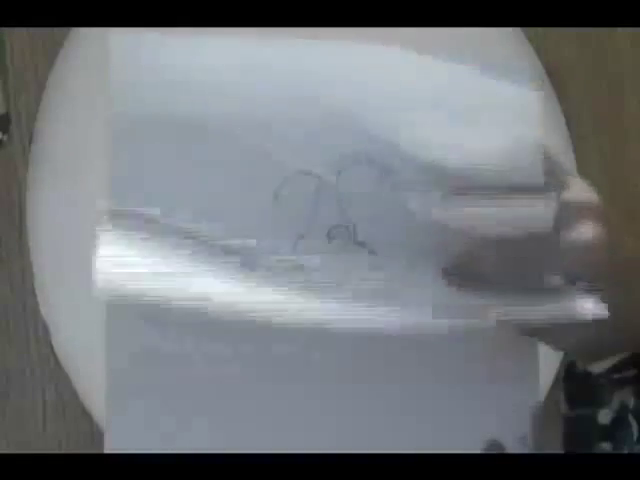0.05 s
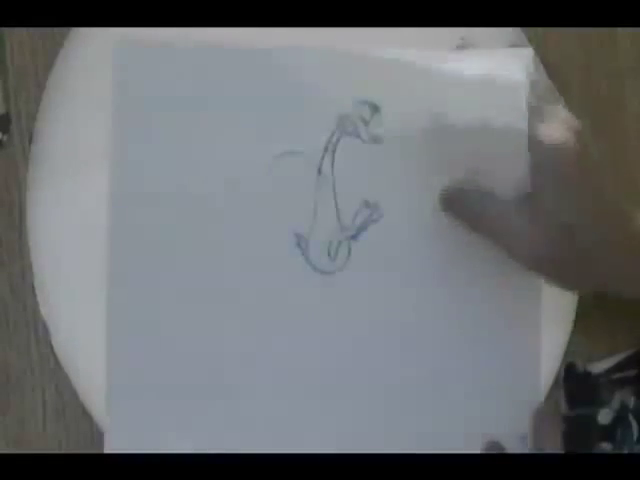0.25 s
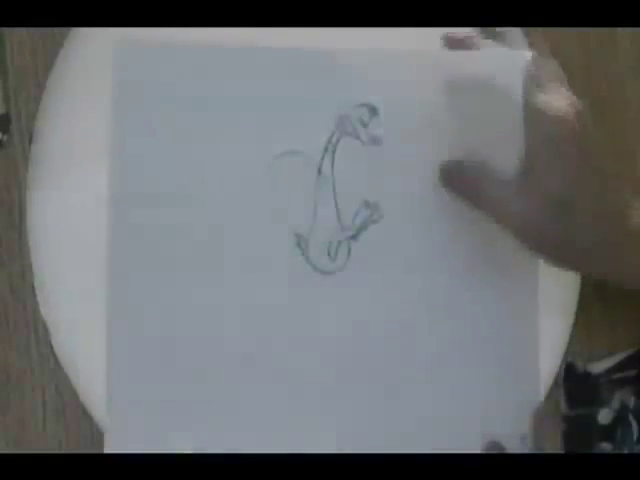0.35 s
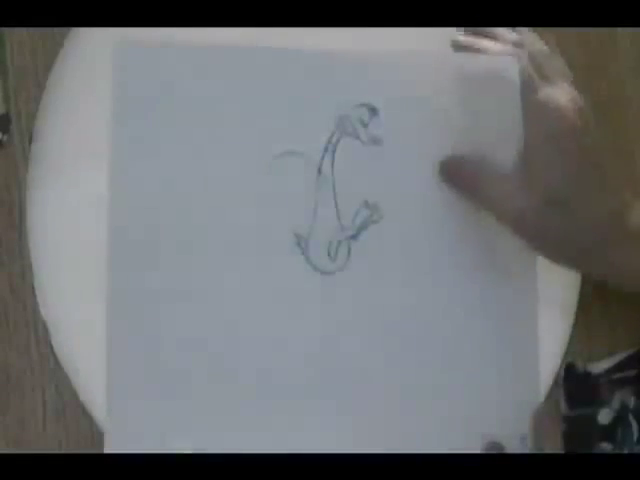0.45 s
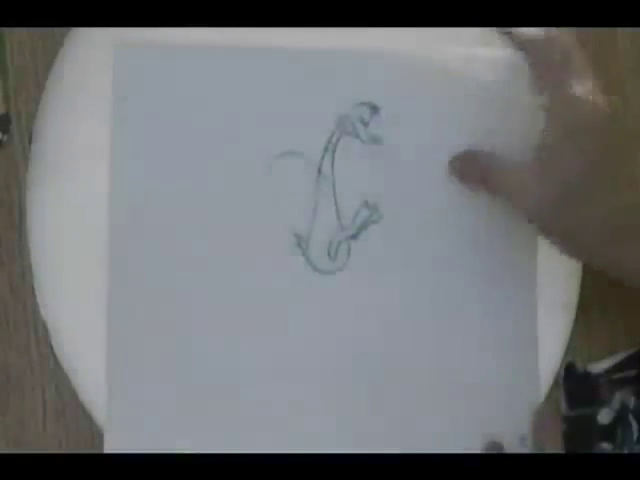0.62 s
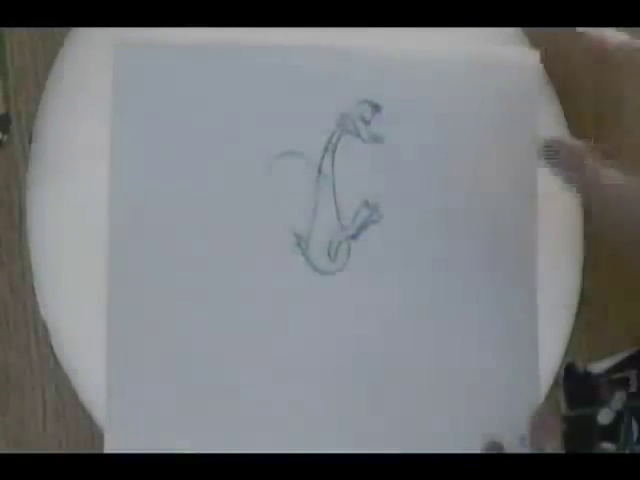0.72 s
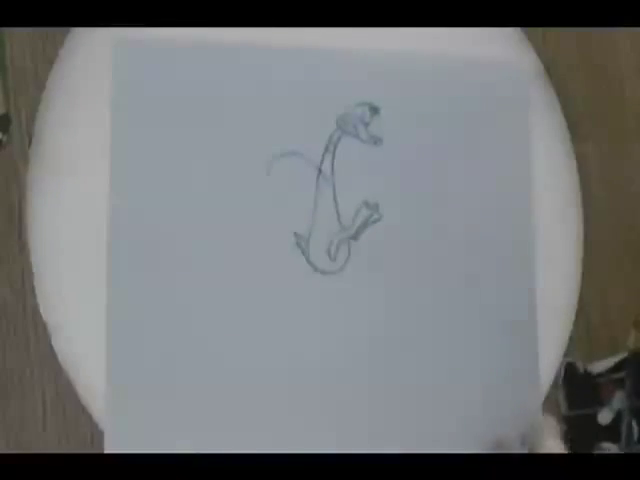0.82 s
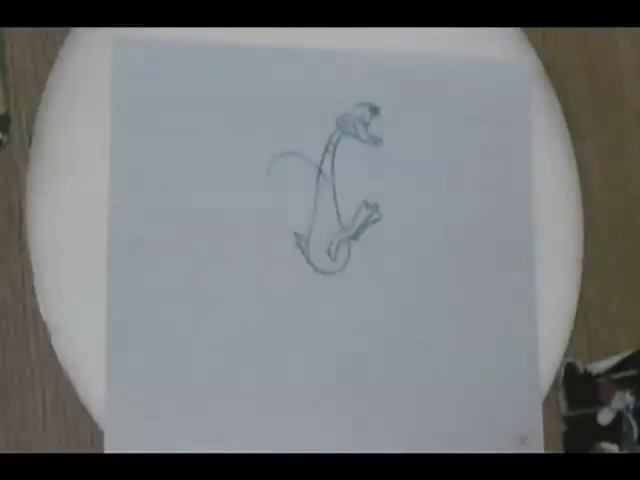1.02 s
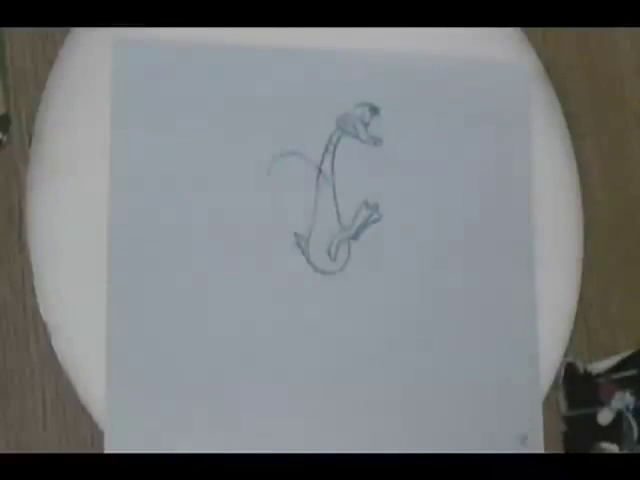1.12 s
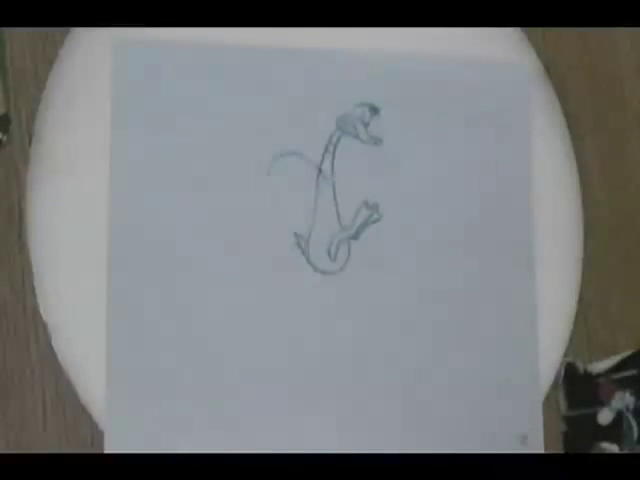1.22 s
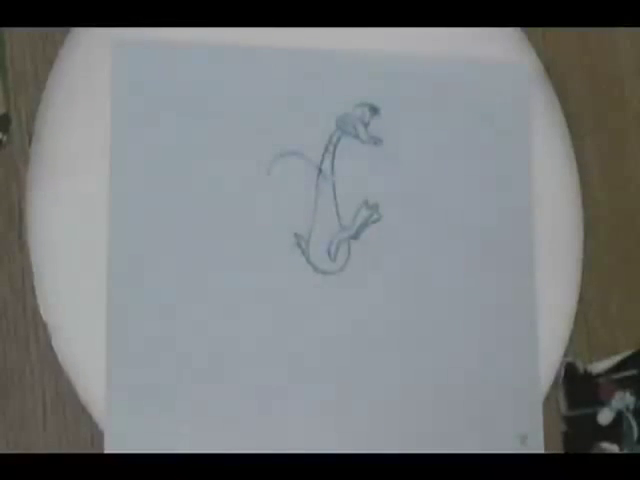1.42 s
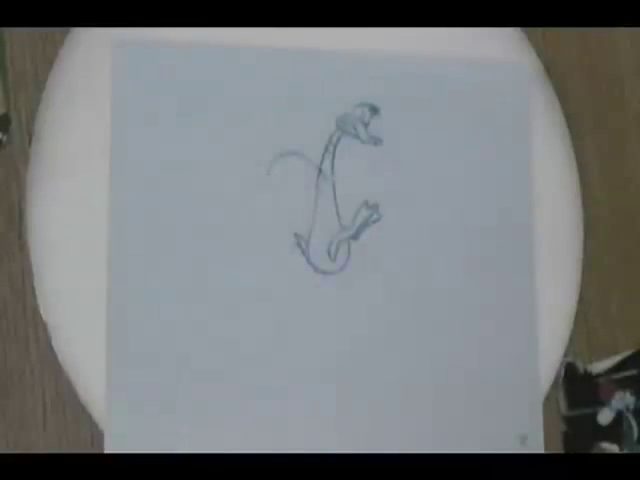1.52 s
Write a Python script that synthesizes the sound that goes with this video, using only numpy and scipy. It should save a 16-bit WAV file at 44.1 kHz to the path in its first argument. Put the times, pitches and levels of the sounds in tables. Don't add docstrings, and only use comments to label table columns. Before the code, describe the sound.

A sheet of paper is let go and smoothed on a desk: light hiss, crackling buckles, one loud bright snap, then small scattered rustles and muffled bumps, heard close with short room ring and low hum.

```python
import sys
import numpy as np
from scipy import signal
from scipy.io import wavfile
from scipy.ndimage import uniform_filter1d

SR = 44100
rng = np.random.default_rng(int(sys.argv[2]) if len(sys.argv) > 2 else 0)


def bounce(signal):
    frames = np.transpose(np.atleast_2d(signal))
    limited = np.clip(frames, -1, 1)
    pcm = np.round(limited * 32767).astype(np.int16)
    wavfile.write(sys.argv[1], SR, pcm)


def amplitude_ratio(level_db):
    exponent = np.asarray(level_db, float) / 20
    return 10 ** exponent


N = 68355
SNAP_S = 0.4915

# (frequency [Hz], gain [dB])
TONE_SHAPE = [(32, -19), (58, -0.5), (140, -7.5), (260, -12), (900, -14.5), (2200, -17.5), (5000, -29.5),
              (15800, -54.5)]
# (frequency [Hz], gain [dB])
TONE_SIDE_SHAPE = [(15, -44), (25, 4), (133, -2.5), (382, 0), (425, -3), (4100, -10), (8270, -18.5),
                   (15800, -44.5)]
# (frequency [Hz], level [dB])
HUM_PARTIALS = [(59, -53), (103, -55)]
# (time [s], level [dB], brightness [dB])
SLIDE_PATH = [(0, -38, -1), (.03, -39.5, -3), (.13, -44.5, 4.5), (.215, -37.5, 0.5), (.235, -38, 6.5),
              (.25, -34, 10), (.28, -39.5, 11.5), (.33, -36, 10), (.36, -47, 13.5), (.43, -38, -1.5),
              (.46, -41, -5), (.5, -42, 6), (.58, -41.5, 6.5), (.63, -37.5, 2), (.68, -41, -3.5),
              (.75, -50.5, 2.5), (1.4, -56, 2), (1.55, -52, 2)]
# (start [s], hold [s], fade t60 [s], level [dB], brightness [dB])
EDGE_SCUFFS = [
    (0.465, 0.041, 0.076, -27.5, -2),
    (0.489, 0.02, 0.24, -29, 2),
    (0.871, 0.034, 0.19, -39.5, -2.5),
    (1.039, 0.02, 0.28, -43, -5),
    (1.106, .01, 0.15, -43, 0),
    (1.119, 0.011, 0.082, -39.5, -15),
    (1.236, 0.012, 0.089, -43.5, -19),
    (1.248, 0.015, 0.3, -36.5, 7.5),
    (1.358, 0.0067, 0.38, -36.5, -7),
    (1.423, 0.026, 0.18, -50.5, -3),
]
# (frequency [Hz], width [Hz], level [dB])
SHEET_MODES = [(1300, 120, 2), (2120, 600, -7), (3190, 50, 3.5), (3720, 97, -27), (5030, 31, -23)]
# (frequency [Hz], gain [dB])
SHEET_SHAPE = [(300, -23.5), (520, -10.5), (900, -13), (1150, -1), (2300, 0), (3900, -5), (4700, -12),
               (15500, -54)]
# (frequency [Hz], gain [dB])
LATE_SCUFF_CUT = [(600, 1), (1150, -7), (1600, 0), (4300, -0.5), (5000, -0.5)]
# (frequency [Hz], gain [dB])
RUB_HISS_SHAPE = [(2500, -13.5), (4500, -1.5), (6000, -0.5), (8000, -0.5), (9000, -6.5), (11000, -8.5),
                  (13500, -15.5), (15500, -24)]
# (start [s], length [s], centre [Hz], level [dB])
DESK_DRAGS = [(1.25, .1, 3100, -46), (.495, .11, 5050, -32.5), (0.0093, .07, 830, -43),
              (.488, .04, 387, -42), (0.969, .1, 300, -47), (.98, .1, 514, -51), (1.4, .15, 750, -48),
              (.494, .1, 3700, -32), (.56, .11, 4800, -41), (.465, .026, 4300, -39), (.925, .13, 140, -46),
              (1.235, .02, 2000, -42), (1.3575, .05, 1500, -38), (.868, .06, 5200, -50),
              (1.1, .05, 5000, -52)]
# (start [s], length [s], centre [Hz], level [dB])
EDGE_SINGS = [(.868, .07, 2680, -45), (.875, 0.046, 1700, -49), (1.055, 0.031, 1650, -43.5),
              (1.045, .02, 2500, -46), (1.12, .045, 1660, -49), (1.262, .045, 1640, -43),
              (1.26, 0.055, 2620, -45), (1.28, .05, 4200, -48.5), (1.25, .04, 3800, -47),
              (.6, .05, 1150, -41.5), (.6, .05, 2150, -39)]
# (time [s], peak [dB], main pitch [Hz], ring t60 [s])
BUCKLES = [(.021, -28, 1544, 0.031), (0.2937, -24, 1300, 0.015), (0.3067, -24, 3150, 0.022),
           (.309, -24, 1900, .015), (0.307, -20.5, 1300, 0.02), (0.328, -34, 2500, .015),
           (0.334, -15, 2203, 0.03), (0.3335, -19, 1140, .024), (0.3386, -15.5, 1956, 0.036),
           (.3397, -10, 2010, 0.015), (0.341, -16, 3610, 0.0098), (.3435, -17, 2110, 0.024),
           (0.347, -19, 1954, 0.031), (0.3353, -17, 3210, .013), (.352, -20, 3220, .012),
           (.3505, -26, 2520, 0.023), (0.4672, -22, 2640, 0.015), (0.474, -14, 1955, 0.006),
           (0.498, -10, 3340, 0.011), (0.5018, -11, 1210, 0.013), (0.5073, -12, 2900, 0.011),
           (.783, -29, 2226, 0.041), (0.7844, -34.5, 3120, 0.029), (0.893, -35, 3060, 0.033),
           (1.05, -39, 2210, .02), (1.133, -33, 1673, 0.025), (1.2517, -32.5, 2750, 0.04),
           (1.2527, -34, 3340, .03), (1.251, -36, 3980, .03), (1.254, -36, 1890, .05),
           (1.281, -34, 1800, 0.053), (1.3595, -30, 1750, 0.018), (1.364, -30, 1590, .025),
           (1.366, -33.5, 2300, 0.03), (1.366, -36.5, 3260, 0.027), (1.379, -32, 1395, 0.046),
           (1.388, -34, 2120, .02), (1.4, -35, 1950, .025), (1.412, -35, 2380, .025),
           (1.425, -33, 1900, .02), (1.445, -37, 750, .04), (.901, -34, 1710, 0.023),
           (1.041, -36, 2830, .02), (1.128, -34, 2680, 0.033), (1.157, -38, 1710, 0.027),
           (0.531, -23, 5940, .012), (.545, -24, 6520, .012), (.564, -24, 6100, 0.013),
           (.519, -17, 3500, 0.017), (1.456, -30.5, 2820, 0.023), (0.518, -23, 6040, .012)]
# (time [s], peak [dB])
EDGE_TICKS = [
    (0.4674, -30),
    (0.4736, -33),
    (0.871, -33),
    (1.2495, -40),
]
# (frequency [Hz], t60 [s])
ROOM_DECAY = [(250, 0.62), (700, 0.86), (1700, 0.58), (4600, 0.7), (12000, 0.2)]
# (frequency [Hz], level [dB], t60 [s])
SNAP_MODES = [(1180, -9.5, 0.016), (2050, -31, .01), (3830, -0.5, 0.011), (4655, -13.5, 0.012),
              (4830, -12.5, 0.0087), (5840, -11, 0.0037), (7700, -17, 0.009), (9640, -19, .01),
              (12900, -14, 0.0045)]
# (frequency [Hz], gain [dB])
CRACK_COLOUR = [(300, -21), (900, -6), (2000, -13.5), (4000, 1), (6500, 3), (8200, -8), (13000, -17),
                (15500, -31)]
# (time [s], peak [dB], pitch [Hz], cycles [count])
DESK_THUDS = [
    (0.936, -29.5, 130, 1.27),
    (0.95, -29.5, 138, 1.4),
    (.9835, -30, 149, 2),
    (0.993, -35, 210, 1.1),
    (.9565, -39, 230, 0.94),
    (1.004, -37, 160, 1.1),
    (1.016, -37, 180, 1.2),
    (1.051, -33.5, 120, 1.5),
    (0.718, -40, 84.5, 1.8),
]
# (time [s], share [dB])
OFF_CENTRE = [
    (.28, -40),
    (.31, -21),
    (.45, -19),
    (.52, -14),
    (.6, -19),
    (.75, -18),
]


def evened(x):
    return x / np.sqrt(np.mean(x ** 2) + 1e-20)


def read(points, hz):
    f, value = np.transpose(points)
    return np.interp(np.log(hz + 1), np.log(f + 1), value)


def add(mix, s, sound):
    part = mix[round(s * SR):][:len(sound)]
    part += sound[:len(part)]


def smoothed(x, size, axis=-1):
    return uniform_filter1d(uniform_filter1d(x, size, axis), size, axis)


def coloured(x, gain_db):
    hz = abs(np.fft.fftfreq(4096, 1 / SR))
    log_gain = np.log(amplitude_ratio(np.maximum(gain_db(hz), -100)))
    taps = np.fft.ifft(np.exp(np.conj(signal.hilbert(log_gain)))).real[:2048]
    return signal.oaconvolve(x, taps)[:len(x)]


def room_tone(shape):
    frames, hz = N // 256 + 5, np.fft.rfftfreq(1024, 1 / SR)
    a, b, patches = rng.standard_normal((frames, 513, 3)).T
    patches = uniform_filter1d(uniform_filter1d(patches, 8, 0), 10, 1)
    patch_db = 2.5 * evened(patches) * np.clip(hz[:, None] / 600, 0, 1)
    z = (a + 1j * b) * amplitude_ratio(read(shape, hz)[:, None] + patch_db) * (hz[:, None] > 30)
    return evened(signal.istft(z, nperseg=1024, noverlap=768)[1][:N])


def mains_hum():
    drift = evened(smoothed(rng.standard_normal(N), 3000))
    turns = np.cumsum(1 + 0.06 * drift) / SR
    return sum(np.sqrt(2) * amplitude_ratio(db) * np.sin(2 * np.pi * hz * turns) for hz, db in HUM_PARTIALS)


def sheet_db(hz):
    bumps = sum(amplitude_ratio(db) / np.sqrt(1 + (2 * (hz - f) / w) ** 2) for f, w, db in SHEET_MODES)
    return read(SHEET_SHAPE, hz) + 0.2 * 20 * np.log10(bumps + 0.54) - 30 * (hz < 250)


def late_scuff_db(hz):
    return sheet_db(hz) + read(LATE_SCUFF_CUT, hz)


def hiss_db(hz):
    return read(RUB_HISS_SHAPE, hz) - 40 * (hz < 2000)


def friction():
    rise_s, hold_droop_db, hiss_level_db, late_s = 0.0033, -0.5, -11, 0.79
    slips_per_s, slip_spread_db, clump_db = 14000, 1.5, 1.5
    t = np.arange(N) / SR
    s, level_db, bright_db = np.transpose(SLIDE_PATH)
    body = amplitude_ratio(np.interp(t, s, level_db))
    hiss = body * amplitude_ratio(np.interp(t, s, bright_db))
    for start, hold, t60, db, bright in EDGE_SCUFFS:
        u = t - start
        fade_db = hold_droop_db * np.clip(u / hold, 0, 1) - 60 * np.maximum(u - hold, 0) / t60
        shape = np.clip(u / rise_s, 0, 1) * amplitude_ratio(db + fade_db)
        body = np.hypot(body, shape)
        hiss = np.hypot(hiss, shape * amplitude_ratio(bright))
    late = np.clip((t - late_s) / .05 + .5, 0, 1)
    layers = [(body * np.sqrt(1 - late), sheet_db),
              (body * np.sqrt(late), late_scuff_db),
              (hiss * amplitude_ratio(hiss_level_db), hiss_db)]
    out = np.zeros(N)
    for drive, colour in layers:
        clump = amplitude_ratio(clump_db * evened(smoothed(rng.standard_normal(N), 150)))
        strength = amplitude_ratio(slip_spread_db * np.minimum(rng.exponential(1, N), 4))
        slips = (rng.random(N) < slips_per_s / SR) * rng.standard_normal(N) * strength * clump
        steady = coloured(slips, colour)
        out += coloured(slips * drive, colour) / np.sqrt(np.mean(steady ** 2))
    return out


def drags(rows, width):
    out = np.zeros(N)
    for s, length, hz, db in rows:
        t = np.arange(0, length, 1 / SR)
        band = lambda f: -20 * np.log(np.maximum(f, 1) / hz) ** 2 / width
        noise = coloured(rng.standard_normal(9000), band)[-len(t):]
        add(out, s, amplitude_ratio(db) * np.sin(np.pi * (t / length) ** 0.56) * evened(noise))
    return out


def pops():
    rise_s, pitch_spread, neighbour_db, puff_db = 0.0011, 0.302, -12, -9.5
    tick_t60, tick_tilt = 0.0025, 0.5
    out, puff, tick = np.zeros((3, N))
    t = np.arange(3000) / SR
    for (s, db, hz, t60), draw in zip(BUCKLES, rng.random((len(BUCKLES), 6))):
        near = sum(np.sin(2 * np.pi * (hz * (1 + pitch_spread * (2 * a - .6)) * t + b))
                   for a, b in draw.reshape(3, 2))
        shape = np.sin(np.pi / 2 * np.minimum(t / rise_s, 1)) ** 2 * amplitude_ratio(db - 60 * t / t60)
        add(out, s - rise_s / 2, shape * (np.sin(2 * np.pi * hz * t) + amplitude_ratio(neighbour_db) * near))
        add(puff, s - rise_s / 2, shape * amplitude_ratio(puff_db))
    for s, db in EDGE_TICKS:
        add(tick, s, amplitude_ratio(db - 60 * t / tick_t60))
    noise = rng.standard_normal(N)
    puffs = coloured(noise * puff, sheet_db) / np.std(coloured(noise, sheet_db))
    ticks = coloured(noise * tick, lambda hz: tick_tilt * read(CRACK_COLOUR, hz))
    return out + puffs + ticks


def room(x):
    gap_s, sameness = .004, 0.98
    size = SR // 2 + SR // 4
    taps = np.zeros((2, size))
    at = np.arange(round(gap_s * SR), size - 20, 12)
    at = at + rng.integers(0, 12, (2, len(at)))
    np.put_along_axis(taps, at, rng.choice([-1., 1.], at.shape), 1)
    hz, t, z = signal.stft(taps, SR, nperseg=256)
    decay = amplitude_ratio(-60 * t / read(ROOM_DECAY, hz)[:, None])
    mid, side = signal.istft(z * decay, SR, nperseg=256)[1]
    spread = np.sqrt(1 - sameness) / 2
    tail = np.array([mid + spread * side, mid - spread * side]) / np.linalg.norm(mid)
    return signal.fftconvolve(x[None], tail, axes=1)[:, :N]


def snap():
    rise_s, crack_db, crack_t60 = 0.00016, -9, 0.017
    ring, crack = np.zeros((2, N))
    t = np.arange(3000) / SR
    rise = np.minimum(t / rise_s, 1)
    modes = sum(amplitude_ratio(db - 60 * t / t60) * np.sin(2 * np.pi * hz * t) for hz, db, t60 in SNAP_MODES)
    add(ring, SNAP_S, -rise * modes)
    noise = evened(coloured(rng.standard_normal(len(t)), lambda hz: read(CRACK_COLOUR, hz)))
    add(crack, SNAP_S, rise * amplitude_ratio(crack_db - 60 * t / crack_t60) * noise)
    return ring, crack


def thuds():
    out, t = np.zeros(N), np.arange(-1300, 1300) / SR
    for s, db, hz, cycles in DESK_THUDS:
        swell = np.exp(-(2 * hz * t / cycles) ** 2)
        add(out, s + t[0], amplitude_ratio(db) * np.cos(2 * np.pi * hz * t) * swell)
    return out


def scene():
    side = np.array([[.5], [-.5]])
    rub = friction() + drags(EDGE_SINGS, 0.0031)
    dragged = drags(DESK_DRAGS, 0.42)
    buckles = pops()
    ring, crack = snap()
    low = amplitude_ratio(-42) * room_tone(TONE_SHAPE) + mains_hum() + thuds() + dragged
    low = low * amplitude_ratio(side * -1.5)
    wet = amplitude_ratio(-6.5) * room(rub + amplitude_ratio(-5) * buckles + amplitude_ratio(-10) * ring + crack)
    share = amplitude_ratio(np.interp(np.arange(N) / SR, *np.transpose(OFF_CENTRE)))
    aside = share * np.roll(rub + wet[0] + dragged + buckles, round(.0013 * SR))
    early = amplitude_ratio(-20) * 2 * np.gradient(ring + crack)
    wide = (aside + early + amplitude_ratio(-60) * room_tone(TONE_SIDE_SHAPE)) * 2 * side
    return rub + buckles + (ring + crack) * amplitude_ratio(side * .8) + wet + low + wide


def band_limit(x):
    return signal.sosfilt(signal.butter(12, 16510, fs=SR, output="sos"), x)


def record(dry):
    edge_hz, offset = 15750, 0.0054
    gate_db, scatter_db, floor_db = -16.5, 5, -76.5
    low_pass = signal.firwin(511, edge_hz, window=("kaiser", 9), fs=SR)
    x = signal.oaconvolve(np.clip(dry, -.9, .9), low_pass[None], "same")
    mid, side = (x[0] + x[1]) / 2, (x[0] - x[1]) / 2
    hz, at, (m, s) = signal.stft(np.array([mid, side]), SR, nperseg=2048)
    band = np.minimum((6 * np.log2(1 + hz / 900)).astype(int), 39)
    bands = range(band.max() + 1)
    power = lambda z: np.array([np.mean(abs(z[band == k]) ** 2, 0) for k in bands])
    scatter = scatter_db * rng.standard_normal((len(bands), m.shape[1]))
    limit = (power(m) + amplitude_ratio(2 * floor_db)) * amplitude_ratio(2 * (gate_db + scatter))
    strong = (power(s) > limit)[band]
    at_snap = (abs(at - SNAP_S) < .02) & (hz[:, None] > 2600)
    keep = strong | (hz[:, None] < 1000) | at_snap
    side = signal.istft(s * keep, SR, nperseg=2048)[1][:N]
    return band_limit(np.array([mid + side, mid - side]) + offset)


dry = scene()
out = record(dry)
bounce(out)
```